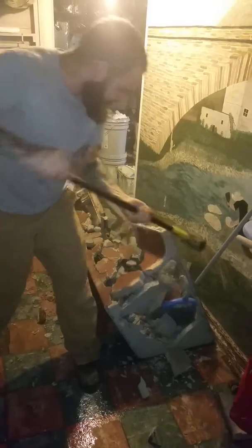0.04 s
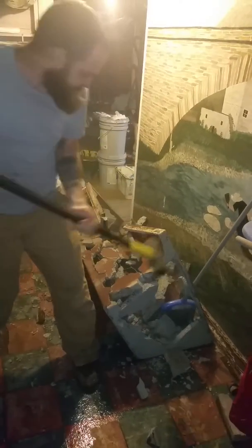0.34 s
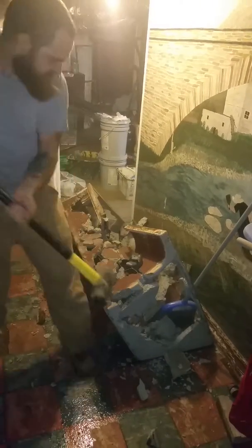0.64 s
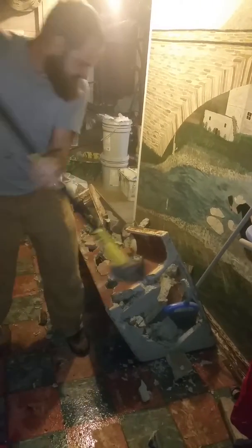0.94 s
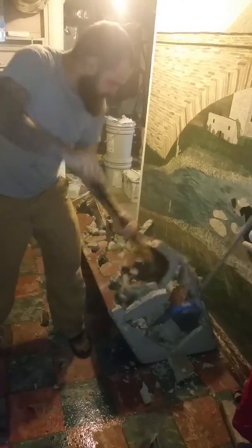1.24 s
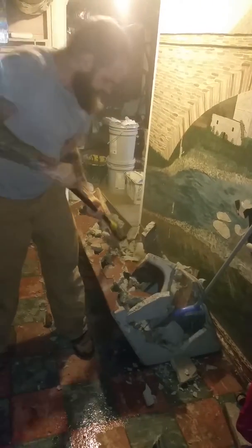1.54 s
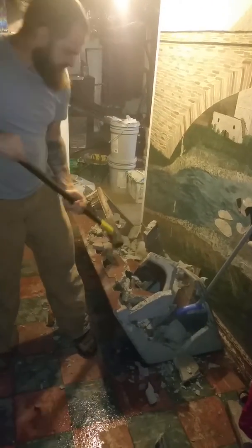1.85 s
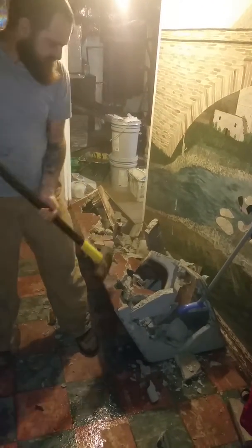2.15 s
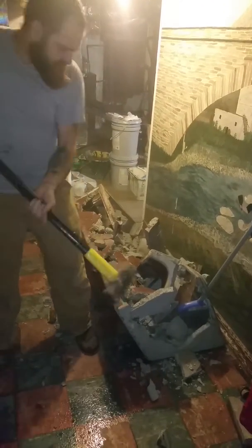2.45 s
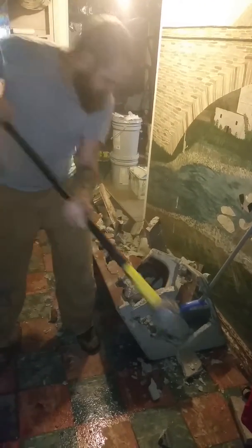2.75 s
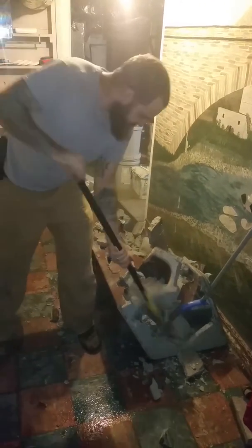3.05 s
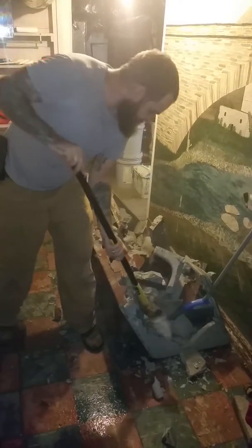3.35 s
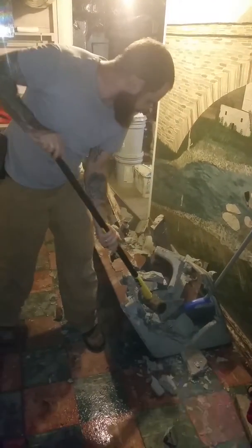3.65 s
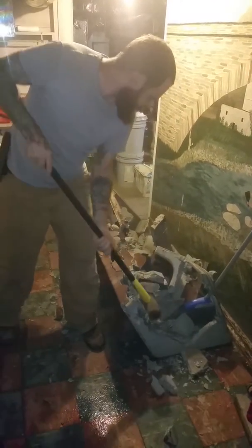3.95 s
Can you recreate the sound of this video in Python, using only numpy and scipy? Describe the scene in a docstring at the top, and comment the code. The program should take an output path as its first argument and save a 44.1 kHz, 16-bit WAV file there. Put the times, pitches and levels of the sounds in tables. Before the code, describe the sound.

A sledgehammer smashes a ceramic sink in a small, echoing room. A knock right at the start leaves pieces clinking until about 0.8 seconds. A loud blow lands at 1.3 seconds, and shards clatter and ring until 2. A few faint bits shift around 2.4. Another hard blow at 3.1 seconds brings hollow thumps, followed by a sharp crack at 3.6, light scraping and trickling grit.

```python
"""A sledgehammer smashes a ceramic sink in a small tiled room. Each blow cracks the basin and slabs
thump into the hollow cabinet: every hit is one hard contact followed by a rattle of smaller ones.
Shards clatter and ring, grit trickles down as tiny clicks, and the hammer head drags through the
rubble between swings. The room echoes all of this, over a faint mains hum."""
import sys
import numpy as np
from scipy import signal
from scipy.fft import rfft, irfft, next_fast_len
from scipy.io import wavfile

SR = 44100
rng = np.random.default_rng(int(sys.argv[2]) if len(sys.argv) > 2 else 0)


def dump(signal):
    """Clip the signal to [-1, 1] and save it as 16-bit WAV at the path in sys.argv[1]."""
    limited = np.clip(np.atleast_2d(signal).T, -1, 1)
    pcm = np.round(limited * 32767).astype(np.int16)
    wavfile.write(sys.argv[1], SR, pcm)


N = 176400
TIME = np.arange(N) / SR
RING = 24576  # samples set aside for one hit and its echo
AGE = np.arange(RING) / SR  # seconds since that hit
TOP_HZ = 16000

# How loud the falling debris is over time. Each row: time in seconds, level in dB.
DEBRIS_LEVEL = [(0, -31.5), (.2, -45.5), (.5, -45.5), (.65, -62.5), (1.28, -75), (1.3, -20), (1.5, -32),
                (1.72, -39), (1.85, -45.5), (1.97, -54), (2.2, -71.5), (3.12, -63), (3.14, -25),
                (3.38, -43), (3.62, -39.5), (3.8, -56), (3.92, -69.5), (4, -62)]
# The tone of the rubble. Each row: frequency in Hz, gain in dB.
RUBBLE_COLOUR = [(25, -40), (52, -25.5), (76, -1.5), (115, -18.5), (160, -3), (245, -6.5), (345, 0),
                 (530, -3), (700, -4.5), (1050, -6.5), (1400, -12.5), (2300, -10.5), (3800, -17.5),
                 (5500, -21), (7100, -22), (8000, -35), (10500, -30.5), (15000, -36), (16500, -52.5)]


def amp(db):
    """Turn decibels into a factor to multiply by."""
    return 10 ** (np.asarray(db) / 20)


def unit(x):
    """Scale to an average energy of one per channel."""
    return x / np.sqrt(np.mean(np.sum(x ** 2, axis=-1)) + 1e-20)


def steady(x):
    """Scale to an average power of one."""
    return x / np.sqrt(np.mean(x ** 2))


def fade(t60):
    """A fade that drops 60 dB in t60 seconds, called the ring time."""
    return np.exp(-np.log(1000) * AGE / max(t60, 1e-3))


def over_hz(points, size):
    """Join (Hz, value) points into a curve across a spectrum."""
    hz, value = np.array(points, float).T
    return np.interp(np.log(np.arange(size // 2 + 1) * SR / size + 1), np.log(hz), value)


def tint(x, points):
    """Change a sound's tone to follow (Hz, dB) points."""
    n = next_fast_len(x.shape[-1] + 4096, True)
    cepstrum = irfft(np.log(amp(over_hz(points, n))), n)
    # Folding this in half keeps the filter from ringing before a hit.
    cepstrum[1:n // 2] *= 2
    cepstrum[n // 2 + 1:] = 0
    return irfft(rfft(x, n) * np.exp(rfft(cepstrum)), n)[..., :x.shape[-1]]


def lean(x, points):
    """Shift a sound sideways by (Hz, dB of left over right) points."""
    return np.array([tint(side, [(hz, sign * db / 2) for hz, db in points])
                     for side, sign in zip(x, (1, -1))])


def through(x, response):
    """Let a mono sound set off a stereo ring or echo."""
    return signal.fftconvolve(x[None], response, axes=1)[:, :len(x)]


def add(out, x, start_s):
    """Mix a sound in at its start time."""
    i = min(max(int(start_s * SR), 0), N - 1)
    out[:, i:i + x.shape[-1]] += x[..., :N - i]


def diffuse(size):
    """Stereo noise whose bass is alike on both sides."""
    # Each row: frequency in Hz, stereo width from 0 (mono) to 1.
    widths = [(60, 0.034), (150, 0.061), (280, 0.1), (550, 0.79), (1000, 1), (16000, 1)]
    mid, side = rng.standard_normal((2, size))
    width = np.clip(over_hz(widths, size), 0, 1)
    spread = np.array([[1], [-1]]) * rfft(side) * np.sqrt(width)
    return irfft((rfft(mid) + spread) / np.sqrt(1 + width), size)


def background(hum_hz=118.4, whine_hz=576):
    """Room air, a mains hum, a low rumble and a thin whine that comes and goes."""
    # Each row: time in seconds, then the levels of hum, rumble and whine in dB.
    loudness = [(0, -90, -34.5, -98), (1.1, -71, -84, -84.5), (2.099, -68, -63, -81),
                (2.52, -68.5, -65, -79), (2.591, -57.5, -55.5, -78), (2.8, -67, -58.5, -72),
                (2.889, -56.5, -61, -66.5), (3.048, -56.5, -56.5, -68.5), (4, -78.5, -64.5, -90.5)]
    # The tone of the air and of the rumble. Each row: frequency in Hz, gain in dB.
    air_colour = [(18, -40.5), (30, -11.5), (112, -3), (194, -6), (319, -10), (461, -12.5), (569, -10),
                  (1220, -16), (6210, -25), (8080, -36.5), (16000, -33)]
    low_colour = [(25, -23.5), (55, -10), (78, -6), (130, -16.5), (340, -13.5), (900, -28.5),
                  (5000, -49.5)]
    times, *levels = np.array(loudness).T
    hum_gain, rumble_gain, whine_gain = (amp(np.interp(TIME, times, db)) for db in levels)
    hum, whine = (np.sqrt(2) * np.sin(2 * np.pi * hz * TIME) for hz in (hum_hz, whine_hz))
    rumble = steady(tint(diffuse(N), low_colour))
    air = steady(tint(diffuse(N), air_colour))
    return amp(-64) * air + hum_gain * hum + rumble_gain * rumble + whine_gain * whine


def room(early_s=0.0058, max_lag_s=.00015, detune=.015):
    """A click in the room: direct sound, echoes off near walls, a tail and the ringing cabinet."""
    # The room's echo. Each row: frequency in Hz, ring time in seconds.
    echo_times = [(80, 0.38), (300, 0.25), (1000, 0.3), (3000, 0.24), (7000, 0.27), (15000, 0.21)]
    # The hollow cabinet and basin. Each row: pitch in Hz, relative level in dB, ring time in seconds.
    cabinet_tones = [(77, -17.5, .5), (160, -2.5, 0.36), (189.3, -6.5, 0.52), (275.6, -10.5, 0.99),
                     (334.2, 3, .3), (396, 0, 0.27), (524, 0.5, 0.2), (600, -7.5, 0.073), (944, -2.5, 0.13)]
    noise = rfft(diffuse(RING))
    tail = cabinet = 0
    for band_hz, t60 in echo_times:
        band = over_hz([(hz, hz == band_hz) for hz, _ in echo_times], RING)
        tail += irfft(noise * band) * fade(t60)
    early = diffuse(RING) * np.exp(-AGE / early_s)
    for hz, db, t60 in cabinet_tones:
        pitch = hz * (1 + detune * rng.standard_normal())
        cabinet += amp(db) * np.sin(2 * np.pi * (pitch * AGE + rng.random())) * fade(t60)
    direct = np.arange(RING) == (rng.random((2, 1)) * max_lag_s * SR).astype(int)
    return unit(direct + amp(1.5) * unit(early) + amp(7) * unit(tail) + amp(-12.5) * unit(cabinet))


def contacts(size, per_s, scatter_db):
    """Random tiny collisions, a few much harder than the rest."""
    happens = rng.random(size) < per_s / SR
    hardness = np.minimum(rng.exponential(size=size), 4)
    return happens * amp(scatter_db * hardness) * rng.choice([-1, 1], size)


def shard(tones=40, low_hz=1386, t60=.055):
    """A click and the short ring of a randomly shaped bit of ceramic."""
    pitches = low_hz * (TOP_HZ / low_hz) ** ((np.arange(tones) + rng.random(tones)) / tones)
    n = SR // 10
    waves = np.sin(2 * np.pi * (pitches[:, None] * AGE[:n] + rng.random((tones, 1))))
    ring = waves.sum(0) * fade(t60)[:n]
    return (AGE == 0) + amp(-9) * np.pad(unit(ring), (0, RING - n))


def grit(spots=5, crumbs_per_s=150):
    """Crumbs of glaze and plaster rain down at a few spots after each blow."""
    # The tone of a crumb. Each row: frequency in Hz, gain in dB.
    colour = [(70, -26.5), (280, -3.5), (380, 3.5), (600, 2), (1200, 0), (3000, -6), (6900, -6.5),
              (8000, -12), (14500, -12.5), (16500, -31)]
    level = amp(np.interp(TIME, *np.array(DEBRIS_LEVEL).T)) / np.sqrt(spots)
    out = np.zeros((2, N))
    for _ in range(spots):
        force = steady(contacts(N, crumbs_per_s / spots, scatter_db=4.5)) * level
        crumb = through(shard(tones=14), room())
        out += through(force, unit(tint(crumb, colour)))
    return out


def scrapes():
    """Rubble grinds under the hammer head in short swells of tiny contacts."""
    # Each row: start in seconds, length in seconds, level in dB, treble tilt in dB per octave.
    drags = [(0.817, 0.076, -48, 2.5), (2.559, 0.055, -57, -0.5), (3.07, 0.03, -41.5, 3.5),
             (3.468, 0.025, -41, 1.5), (3.649, 0.14, -46, -2)]
    out = np.zeros((2, N))
    for start, length, db, tilt_db in drags:
        swell = np.sqrt(np.sin(np.pi * np.minimum(AGE / length, 1)))
        force = contacts(RING, per_s=6500, scatter_db=4.0) * swell
        colour = [(hz, gain + tilt_db * np.log2(hz)) for hz, gain in RUBBLE_COLOUR]
        grind = tint(through(force, through(shard(), room())), colour)
        add(out, unit(grind) * np.sqrt(length * SR) * amp(db), start)
    return out


def spray(count=30, from_s=1.3, until_s=1.85, low_hz=1900, high_hz=6000, scatter_db=14.5):
    """Shards thrown by the second blow land one by one, each with a tick and two tones."""
    out = np.zeros((2, N))
    for k, (when, smallness, shape, force, sustain) in enumerate(rng.random((count, 5))):
        start = from_s + (until_s - from_s) * (k + when) / count
        hz = low_hz * (high_hz / low_hz) ** smallness
        tones = np.sin(2 * np.pi * hz * AGE) + np.sin(2 * np.pi * hz * (1 + shape / 2) * AGE)
        ring = tones * fade(.022 * (.5 + sustain))
        clink = unit(through(unit(ring) + .5 * (AGE == 0), room())) * np.linalg.norm(ring)
        db = np.interp(start, *np.array(DEBRIS_LEVEL).T) + 2 + scatter_db * (force - .5)
        add(out, clink * amp(db), start)
    return out


def rings(strikes):
    """Each struck piece rings on one strong tone, smeared by the room."""
    out = np.zeros((2, N))
    for start, hz, db, t60 in strikes:
        ring = np.sin(2 * np.pi * hz * AGE) * (1 - np.exp(-hz * AGE)) * fade(t60)
        echo = through(ring * fade(t60), room())
        add(out, amp(db) * np.linalg.norm(ring) * (0.33 * unit(ring) + 0.7 * unit(echo)), start)
    return out


def bouncing_shard():
    """A thin shard rings with the same tones at each bounce on the tiles."""
    # Each row: pitch in Hz, relative level in dB, ring time in seconds.
    tones = [(4970, -9.5, 0.2), (6780, 3, 0.13), (7000, -1, 0.048), (9700, -15, .08)]
    # Each row: start in seconds, level in dB.
    bounces = [(0.205, -24), (.409, -36)]
    return rings([(start, hz, db + tone_db, t60) for start, db in bounces for hz, tone_db, t60 in tones])


def chinks():
    """A few shards ring out clearly above the clatter."""
    # Each row: start in seconds, pitch in Hz, level in dB, ring time in seconds.
    strikes = [(1.426, 1520, -9.5, 0.07), (1.426, 2360, -23, 0.049), (1.695, 1098, -25, 0.09),
               (1.734, 2880, -35, 0.068), (1.769, 4480, -23.5, 0.048), (1.767, 11820, -28, 0.023),
               (2.334, 2910, -39.5, 0.07), (2.334, 3480, -40, 0.07), (2.457, 1105, -50, 0.2),
               (3.39, 1084, -42, 0.52), (3.575, 2440, -26, 0.064), (3.575, 2790, -27, .06),
               (3.665, 7200, -42, .08)]
    return rings(strikes)


def cabinet_booms():
    """The hollow cabinet booms under heavy slabs."""
    # Each row: start in seconds, pitch in Hz, level in dB, ring time in seconds.
    strikes = [(1.295, 77, -27.5, 0.92), (1.47, 184, -25, 0.27), (3.2, 160, -15, 0.57),
               (3.238, 185, -15.5, 0.2), (3.238, 353, -17, 0.16), (3.238, 541, -10.5, 0.18)]
    return rings(strikes)


def glaze_snaps(t60=0.012):
    """The brittle glaze gives way in dry cracks, each a short burst of noise. The low burst at 1.291 s is the
    hammer head's own first thunk."""
    # Each row: start in seconds, strongest frequency in Hz, level in dB.
    cracks = [(0.203, 9000, -31), (0.642, 9400, -41.5), (1.168, 4970, -43.5), (1.291, 700, -17.5),
              (1.296, 6000, -16), (1.425, 1990, -24), (1.824, 5000, -36.5), (2.332, 7000, -45.5),
              (3.132, 1900, -3.5), (3.133, 6000, -11), (3.5715, 5500, -17.5)]
    out = np.zeros((2, N))
    burst = fade(t60)
    for start, hz, db in cracks:
        colour = [(hz / 12, -50), (hz / 2, -5), (hz, 0), (hz * 1.2, -8), (hz * 4, -22), (hz * 10, -48)]
        crack = np.linalg.norm(burst) * unit(tint(diffuse(RING) * burst, colour))
        add(out, amp(db) * (crack + amp(-7) * through(crack[0], room())), start)
    return out


def set_bands(hit, edges_hz, band_db):
    """Filter a hit so that its opening comes close to the given level in each frequency band."""
    n = SR // 10
    opening = hit[:, :n] * np.cos(np.linspace(0, np.pi / 2, n))
    power = 4 * np.mean(abs(rfft(opening)) ** 2, axis=0) / n ** 2
    gains = [(np.sqrt(lo * hi), db - 10 * np.log10(power[lo * n // SR:hi * n // SR].sum()))
             for lo, hi, db in zip(edges_hz, edges_hz[1:], band_db)]
    return tint(hit, gains)


def impacts(hits, edges_hz, spots, rattle_db, delay_s=.002):
    """Each hit is one hard contact and a dying rattle of smaller ones at three other spots."""
    out = np.zeros((2, N))
    for start, db, *band_db, rattle_s, pan_db in hits:
        first, *others = rng.permutation(len(spots))[:4]
        dying = np.exp(-AGE / rattle_s)
        rattle = sum(through(contacts(RING, per_s=400, scatter_db=2.5) * dying, spots[k]) for k in others)
        hit = tint(unit(spots[first]) + amp(rattle_db) * unit(rattle), RUBBLE_COLOUR)
        for _ in range(2):  # neighbouring bands affect each other, so go twice
            hit = set_bands(hit, edges_hz, db + np.array(band_db))
        add(out, lean(hit, [(210, 0), (1200, pan_db)]), start + delay_s)  # bass stays in the middle
    return out


def falling_pieces(spots, pan_db=-0.1):
    """Broken pieces drop onto the rubble and rattle to rest."""
    # Each row: start in seconds, relative level in dB, five band levels in dB added to it (thud,
    # knock, clack, chink, tick), rattling time in seconds.
    landings = [(0.122, -29, -22, -27, -13, -6.5, -22, 0.017),
                (0.202, -18, -13, -14, -16.5, -19, -21.5, 0.021),
                (0.224, -23, -6, -9.5, -15, -19, -24, 0.014),
                (0.25, -20, -16.5, -8.5, -9, -18.5, -41, 0.014),
                (0.316, -30, -19, -22, -13.5, -10, -31, 0.0053),
                (0.344, -25, -10, -12.5, -7.5, -34, -42, 0.02),
                (0.391, -25, -10.5, -12.5, -21, -29, -36, 0.0073),
                (0.471, -23.5, -15.5, -14, -8.5, -18.5, -38, 0.016),
                (0.507, -24, -14.5, -15.5, -37, -30, -26, 0.0038),
                (0.637, -43.5, -35, -36, -43, -8.5, -7.5, 0.025),
                (0.737, -47, -15, -5, -4, -12.5, -28, 0.027), (0.777, -38, -16, -20, -12, -16, -28, 0.013),
                (1.168, -42.5, -28, -24.5, -5, -7, -24, 0.012),
                (1.55, -15.5, -11.5, -11, -17, -17.5, -23, 0.0055),
                (1.589, -26.5, -5, -11, -13, -21, -27, 0.025),
                (1.631, -21, -16, -24, -15, -10, -17.5, 0.01),
                (1.688, -17, -48, -12, -16, -14, -24.5, 0.014),
                (1.767, -25.5, -17, -55, -21.5, -7.5, -18, 0.005),
                (1.822, -22.5, -12.5, -14, -11.5, -15, -20, 0.013),
                (1.97, -38, -15, -23.5, -10.5, -9, -14, 0.015),
                (2.328, -34, -29, -46.5, -15, -13.5, -17, 0.022),
                (2.433, -42, -9, -8, -12.5, -14.5, -35, 0.029),
                (2.55, -31, -16, -15, -10.5, -18, -21, 0.023),
                (3.568, -16.5, -17.5, -19, -11.5, -23, -19.5, 0.009)]
    # The borders of those bands in Hz.
    edges_hz = [150, 700, 1500, 3500, 7500, 16000]
    return impacts([(*row, pan_db) for row in landings], edges_hz, spots, rattle_db=3.5)


def hammer_blows(spots):
    """The hammer and heavy slabs strike, and the ceramic crumbles around each hit."""
    # Each row: start in seconds, relative level in dB, six band levels in dB added to it (boom, thump,
    # body, knock, crack, splinters), crumbling time in seconds, left over right in dB.
    hits = [(0.001, -6, -44, -20.5, -9, -13, -17, -21, 0.0038, -0.5),
            (0.045, -22, -36, -12, -8, -15, -11, -11.5, 0.013, 4),
            (1.291, 0, -24, -29, -8.5, -11.5, -21, -23.5, 0.011, 0),
            (1.315, -6.5, -23.5, -14.5, -11.5, -12.5, -11, -24.5, 0.0088, 0.5),
            (1.347, -2.5, -25.5, -21, -12.5, -13, -18, -27, 0.018, 1),
            (1.379, -10.5, -20.5, -14.5, -4.5, -13, -24.5, -17.5, 0.037, -0.5),
            (1.423, -8, -34.5, -19, -20.5, -8.5, -6.5, -23, 0.009, 1.5),
            (1.451, -7.5, -27.5, -16, -13, -13, -16, -20, 0.011, -5.5),
            (1.471, -4.5, -48.5, -16, -14.5, -22, -17.5, -24.5, 0.026, 3.5),
            (3.13, 0, -50, -31.5, -18.5, -8.5, -8, -24.5, 0.0053, -2),
            (3.164, -9, -50, -26.5, -8.5, -9.5, -12, -24, 0.01, 6),
            (3.198, -4, -54, -20, -8.5, -10, -21.5, -40, 0.01, 3),
            (3.236, -10, -51, -26, -2.5, -8.5, -15, -26, 0.017, -4)]
    # The borders of those bands in Hz.
    edges_hz = [50, 120, 280, 700, 1500, 3500, 16000]
    return impacts(hits, edges_hz, spots, rattle_db=-1)


def scene():
    """Blows and pieces land at scattered spots; their treble leans to the right."""
    # Each row: frequency in Hz, left over right in dB.
    balance = [(60, -1.5), (110, 1), (200, 0.5), (380, -2.5), (700, 0.5), (1290, 0.5), (2380, 2.5),
               (4400, -4), (8120, -5), (15000, 0)]
    spots = [through(shard(), room()) for _ in range(14)]
    blows = amp(-6) * hammer_blows(spots)
    pieces = amp(-7) * falling_pieces(spots)
    ringing = chinks() + cabinet_booms() + bouncing_shard() + spray()
    smash = blows + pieces + glaze_snaps() + scrapes() + ringing + grit()
    return lean(smash, balance) + background()


def record(dry):
    """Drop the deepest bass, round off the loudest peaks and cut the highest treble."""
    bass_cut = signal.butter(2, 42, "high", fs=SR, output="sos")
    treble_cut = signal.ellip(8, .2, 80, TOP_HZ, fs=SR, output="sos")
    rounded = np.tanh(signal.sosfilt(bass_cut, dry))
    return signal.sosfilt(treble_cut, rounded)


dry = scene()
out = record(dry)
dump(out)
```